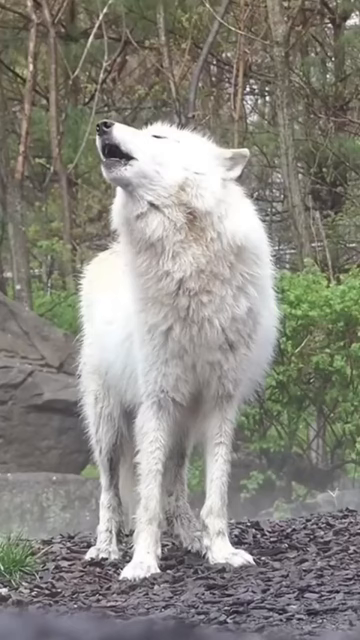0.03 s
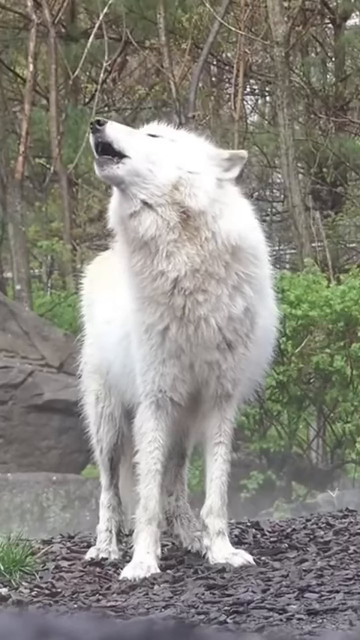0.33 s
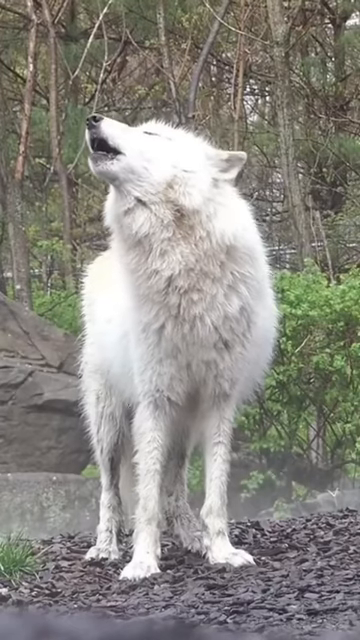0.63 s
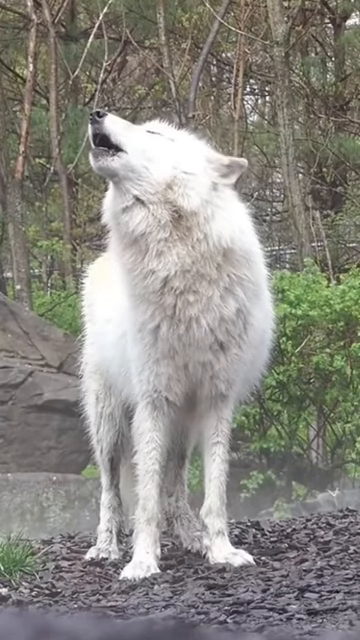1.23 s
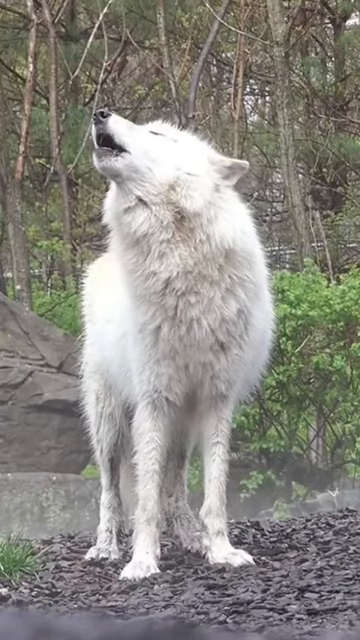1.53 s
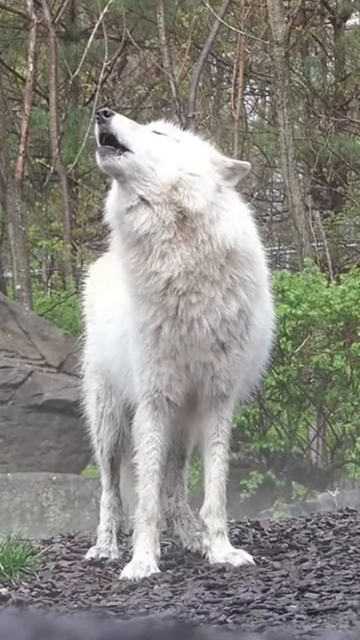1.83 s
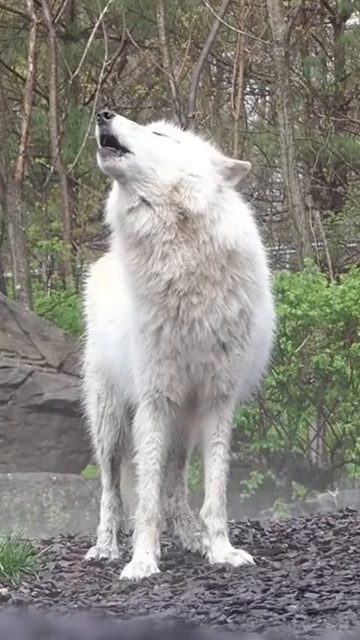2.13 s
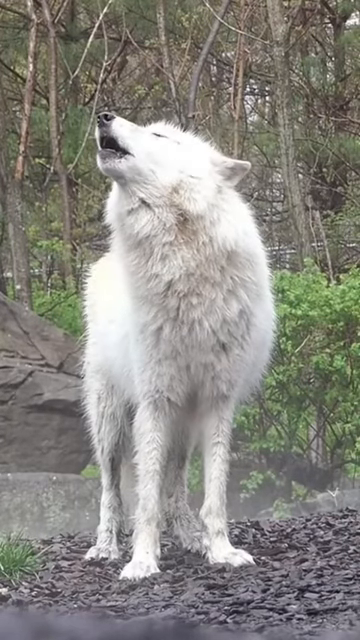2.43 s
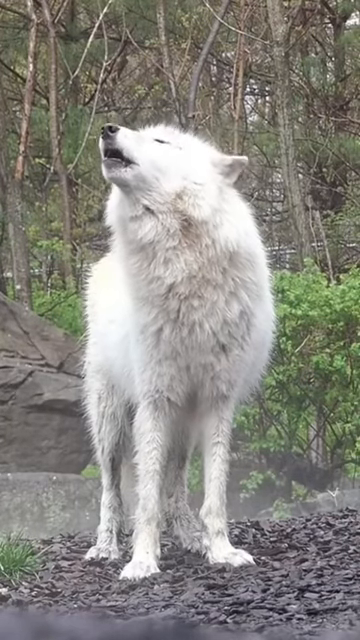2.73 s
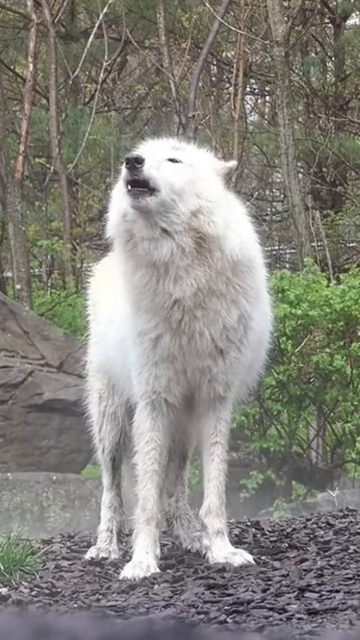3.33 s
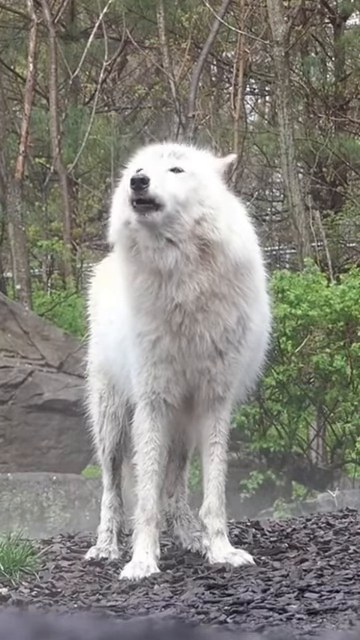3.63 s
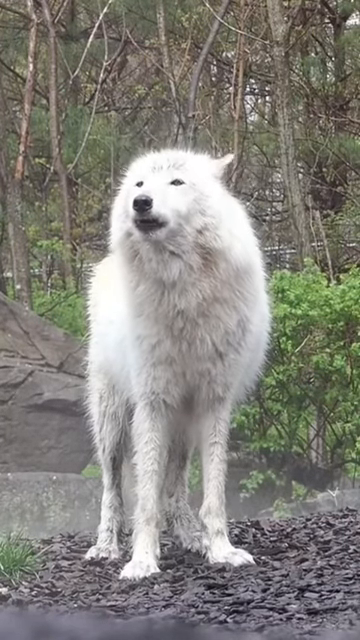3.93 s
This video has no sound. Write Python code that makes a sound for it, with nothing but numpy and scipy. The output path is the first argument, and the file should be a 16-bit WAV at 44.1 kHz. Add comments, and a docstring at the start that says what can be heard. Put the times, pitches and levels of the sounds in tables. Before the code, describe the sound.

A wolf howls close by, turning hoarse as a second wolf joins from farther off.

```python
"""A wolf close by holds one long, slowly sinking howl among trees, while a low outdoor rumble swells.
A thin whistling whine rides over the start, shaken for a moment by a falling squeal. After a faint tick
at about 2 s, a second wolf joins from farther off. Just after that, the near howl breaks to a lower,
hoarse voice: its vocal folds now vibrate in two ways at once, making two tones that beat together."""
import sys
import numpy as np
from scipy import signal
from scipy.fft import rfft, irfft
from scipy.io import wavfile

SR = 44100
rng = np.random.default_rng(int(sys.argv[2]) if len(sys.argv) > 2 else 0)


def file_out(sig):
    """Save sig as 16-bit WAV at sys.argv[1]."""
    # one column per channel
    cols = np.atleast_2d(sig).T
    # limit, then scale
    lim = np.clip(cols, -1, 1)
    pcm = np.round(lim * 32767).astype(np.int16)
    wavfile.write(sys.argv[1], SR, pcm)


N = 176400
T = np.arange(N) / SR
MOUTH_SHIFT_S, BREAK_S, BREAK_FADE_S = 2.1, 2.535, 0.0067


def amp(db):
    """Turns decibels into a gain."""
    return 10 ** (np.asarray(db) / 20)


def unit(x):
    """Scales a signal to an average (rms) size of 1."""
    return x / np.sqrt(np.mean(x ** 2) + 1e-20)


def curves(rows):
    """Turns each column after the time into one value per sample."""
    times, *columns = np.transpose(rows)
    return [np.interp(T, times, column) for column in columns]


def read(points, hz):
    """Looks up a spectrum's level at hz."""
    f, level = np.transpose(points)
    return np.interp(np.log(hz + 1), np.log(f), level)


def gate(start, end, fade=0.0085):
    """Fades in at start and out at end (all in seconds)."""
    return np.sin(np.pi / 2 * np.clip(np.minimum(T - start, end - T) / fade + .5, 0, 1)) ** 2


def during(rows):
    """Lets sound through from a table's first time to its last."""
    return gate(rows[0][0] - .006, rows[-1][0] + 0.017)


def noise(points):
    """Noise shaped like the given spectrum, at size 1."""
    gain = amp(read(points, np.fft.rfftfreq(N, 1 / SR)))
    return unit(irfft(rfft(rng.standard_normal(N)) * gain, N))


def wander(hz):
    """A random wobble, up to about hz times a second."""
    rolloff = 1 + (np.fft.rfftfreq(N, 1 / SR) / hz) ** 4
    return unit(irfft(rfft(rng.standard_normal(N)) / rolloff, N))


def phase(hz, jitter):
    """The running angle of a vibration whose pitch wobbles by the fraction jitter."""
    return 2 * np.pi * np.cumsum(hz * (1 + jitter * wander(45))) / SR


def partial(angle, db, flutter_db=3.5, flutter_hz=14):
    """One pure tone whose strength flutters."""
    return amp(db + flutter_db * wander(flutter_hz)) * np.cos(angle + 2 * np.pi * rng.random())


def airy(angle, width_hz):
    """A narrow band of breathy noise around a tone."""
    return wander(width_hz) * np.cos(angle) + wander(width_hz) * np.sin(angle)


def background():
    """Outdoor air: a steady thin hiss, a swelling distant rumble and a faint far tone."""
    # spectra of the hiss and the rumble: f/Hz, relative level/dB
    hiss_shape = [(1100,2.5),(2800,-6),(4200,-1),(8000,-12.5),(15000,-22.5)]
    rumble_shape = [(55,-30),(85,-8.5),(130,4.5),(230,1.5),(480,-13.5),(1000,-15),(2500,-28),(15000,-45.5)]
    # the rumble's swell: t/s, level/dB
    swell = [(.13,-83.5),(1.6,-63),(2.4,-56.5),(4,-49)]
    rumble = noise(rumble_shape) * amp(curves(swell)[0] + 0.78 * wander(11))
    tone = amp(-86) * airy(2 * np.pi * 413 * T, width_hz=3) * np.clip(T / 1.1, 0, 1)
    return amp(-77.5) * noise(hiss_shape) + rumble + tone * gate(0, BREAK_S)


def clear_howl():
    """A nearly pure note; its faint overtones change as the voice swells and as the mouth shifts."""
    # the clear note: t/s, f/Hz, level/dB
    note = [(.15,713,-43),(.42,709.4,-43.5),(.78,713.6,-40.5),(1.42,701.8,-39),(1.51,695.7,-35),(1.6,685.4,-25),(1.77,676,-30),(1.86,672.7,-27),(2.02,671.7,-26),(2.09,667.8,-29.5),(2.21,657.2,-24),(2.27,645.6,-28.5),(2.38,640,-26),(2.43,613,-31.5),(2.52,604.6,-28)]
    # overtones from the octave up, for soft start, full voice and shifted mouth: relative level/dB
    soft = [-22,-49,-55,-35.5]
    full = [-19,-40.5,-61.5,-64,-50.5]
    late = [-16.5,-49.5,-54,-66,-59,-66.5,-55,-67.5,-58,-67.5,-71.5,-79,-67.5,-68,-64]
    hz, db = curves(note)
    angle = phase(hz, jitter=.0009)
    swelled, shifted = np.interp(T, [0.33, 0.64], [0, 1]), gate(MOUTH_SHIFT_S, np.inf)
    blend = [(1 - swelled, soft), (swelled - shifted, full), (shifted, late)]
    breath = amp(db - 36.5) * airy(angle, width_hz=90)
    voice = partial(angle, db, flutter_db=0.62, flutter_hz=30) + breath
    for i in range(len(late)):
        strength = sum(share * amp(levels[i]) for share, levels in blend if i < len(levels))
        voice += strength * partial((i + 2) * angle, db, flutter_db=4 if i > 1 else 1.3, flutter_hz=10)
    return np.sqrt(2) * voice * gate(0, BREAK_S, BREAK_FADE_S)


def whine():
    """Thin, airy whistles; a falling squeal shakes their strength and pitch while it lasts."""
    # three whistles and the squeal: t/s, f/Hz, level/dB
    whistles = [
        [(.15,5560,-64),(.25,5535,-59.5),(.35,5495,-63),(.5,5460,-61),(.67,5450,-61),(.75,5377,-59.5),(.85,5420,-60.5),(1.07,5376,-71),(1.28,5260,-71)],
        [(1.325,5170,-73.5),(1.4,5050,-70),(1.6,5240,-87.5)],
        [(2.46,4800,-79.5),(2.555,4520,-53.5),(2.62,4110,-66)],
    ]
    squeal = [(.655,1064,-50.5),(.79,976,-60),(.97,936,-61),(1.06,848,-55.5),(1.2,816,-52.5),(1.285,766,-48)]
    hz, db = curves(squeal)
    squeal_angle, on = phase(hz, jitter=0.0042), during(squeal)
    octave_gain = amp(-16.5) / (1 + (2 * hz / 1680) ** 20)  # fades above 1680 Hz
    voice = on * amp(db) * (np.cos(squeal_angle) + octave_gain * np.cos(2 * squeal_angle))
    shake = np.exp(0.82 * on * amp(3.2 * wander(12)) * (np.cos(squeal_angle) - .5))
    for rows in whistles:
        hz, db = curves(rows)
        angle = phase(hz, jitter=0.0035) + .05 * on * np.sin(squeal_angle)
        tone = partial(angle, db, flutter_db=2.5, flutter_hz=15)
        octave = partial(2 * angle, 2 * db + 36) * gate(0, MOUTH_SHIFT_S)  # shows on strong whistles
        breath = amp(db - 20) * airy(angle, width_hz=417)
        voice += during(rows) * shake * (tone + octave + breath)
    return np.sqrt(2) * voice


def trees(x):
    """Tree trunks scatter about 1500 echoes a second, which die away by 60 dB in one second."""
    t = T[:SR]
    tail = rng.standard_normal(SR) * (rng.random(SR) < 1500 / SR)
    tail *= (t > .015) * amp(-60 * t)
    return signal.fftconvolve(x, tail / np.linalg.norm(tail))[:N]


def tick(start_s=2.087, decay_s=0.0062):
    """One faint, bright tick: a burst of noise that dies at once."""
    age = np.maximum(T - start_s, 0)
    burst = rng.standard_normal(N) * (age > 0) * np.exp(-age / decay_s)
    band = signal.butter(2, [2600, 4700], "bandpass", fs=SR, output="sos")
    return amp(-50.5) * signal.sosfilt(band, burst)


def second_wolf():
    """A rounder, almost pure howl from farther off: a rising lead-in, then a long note."""
    # the two notes: t/s, f/Hz, level/dB
    lead_in = [(2.38,661,-55),(2.46,720,-44),(2.6,763,-55)]
    answer = [(2.718,910,-42),(2.791,877.5,-33.5),(2.921,853,-29),(3.12,872.6,-37.5),(3.191,850,-24.5),(3.332,838.3,-25),(3.5,809,-25.5),(3.7,791.2,-23.5),(4,779.7,-20)]
    # their octave: f/Hz, relative level/dB
    octave = [(1570,-42),(1690,-32.5),(1800,-44)]
    voice = np.zeros(N)
    for rows in (lead_in, answer):
        hz, db = curves(rows)
        angle = phase(hz, jitter=0.0012)
        voice += during(rows) * amp(db) * (np.cos(angle) + amp(read(octave, 2 * hz)) * np.cos(2 * angle))
    return np.sqrt(2) * voice


def hoarse_howl():
    """After the break the vocal folds swing unevenly, and a second vibration beats with the first."""
    # the main vibration and the second, lower one: t/s, f/Hz, level/dB
    note = [(2.55,498.6,-33.5),(2.61,463.3,-27.5),(2.72,456.4,-31.5),(2.87,435.8,-25.5),(3.02,441.2,-28.5),(3.13,455,-32.5),(3.25,440,-27),(3.44,441.9,-28),(3.53,477,-30),(3.62,455,-25),(3.74,449,-30.5),(3.865,425,-26.5),(3.9,363.7,-19),(4,346.3,-23)]
    split_note = [(2.56,400.9,-40),(2.64,383.9,-37.5),(3.11,369,-66.5),(3.17,373.3,-35),(3.44,368,-34),(3.53,388.4,-25.5),(3.73,377.7,-25.5),(3.82,384.4,-24.5),(3.885,369.3,-33.5)]
    # overtones the throat gives at full voice: f/Hz, level/dB
    throat = [(280,-42),(720,-35.5),(1000,-46.5),(1350,-45),(1700,-70.5),(2200,-61),(2900,-90.5),(3900,-66.5),(4900,-82)]
    # tones added when every third swing is stronger: multiple of a third of the pitch, relative level/dB
    thirds = [(2,-14),(4,-11),(5,-15.5),(7,-29),(8,-15)]
    # their strength: t/s, level/dB
    thirds_db = [(2.54,-53.5),(2.64,-32.5),(2.86,-27.5),(3.05,-30.5),(3.14,-45.5)]
    full_voice_db, build_s = -20.5, 0.098
    hz, db = curves(note)
    split_hz, split_db = curves(split_note)
    angle, split_angle = phase(hz, jitter=.0035), phase(split_hz, jitter=.0035)
    beat_angle = angle - split_angle
    build = np.clip((T - BREAK_S) / build_s, 0, 1)
    voice = partial(angle, db, flutter_db=0.57, flutter_hz=45)
    for k in range(2, 15):
        voice += build * partial(k * angle, read(throat, k * hz) + 0.49 * (db - full_voice_db))
    for k, level in thirds:
        voice += partial(k * angle / 3, level + curves(thirds_db)[0], flutter_db=1.5) * during(thirds_db)
    voice += partial(1.5 * angle, db=-50) * gate(2.6, 4.1)  # every second swing is stronger
    split = amp(split_db) * np.cos(split_angle)
    # the two vibrations mix, adding tones j beat rates away from k times the pitch
    for k in range(1, 7):
        for j in range(-2, 4):
            if j and (k, j) != (1, -1):  # (1, -1) is the second vibration itself
                level = read(throat, abs(k * hz + j * (hz - split_hz))) - 2.5 - abs(j)
                split += partial(k * angle + j * beat_angle, level + 0.67 * (split_db - full_voice_db))
    tones = np.sqrt(2) * (voice + split * during(split_note))
    return (tones + build * rasp(beat_angle) + head_rings()) * gate(BREAK_S, np.inf, BREAK_FADE_S)


def rasp(beat_angle):
    """Rough breath that pulses with the beat between the two vibrations."""
    # its spectrum: f/Hz, relative level/dB
    shape = [(200,-8),(430,18),(950,2),(1300,9.5),(1750,-20.5),(2150,-8),(2900,-27),(6400,-25),(8200,-34.5),(9600,-29),(15000,-55)]
    # its strength: t/s, level/dB
    strength = [(2.6,-45.5),(3,-50.5),(3.45,-42.5),(3.55,-43.5),(3.85,-42),(3.93,-45.5)]
    pulse = unit(1 + .5 * np.cos(beat_angle))
    return noise(shape) * pulse * amp(curves(strength)[0] + wander(13))


def head_rings():
    """Hoarse air rings at a few high pitches inside the wolf's head."""
    # resonances: start/s, end/s, f/Hz, width/Hz, level/dB
    rings = [(2.6,3.97,4000,130,-64),(1.4,2.93,4450,190,-65.5),(3.5,3.92,3620,45,-66.5),(3.08,4.4,6370,90,-76.5)]
    return sum(gate(start, end, fade=0.087) * amp(db + 2 * wander(12)) * airy(2 * np.pi * hz * T, width)
               for start, end, hz, width, db in rings)


def scene():
    """Mixes the voices, their echoes and the background; the far wolf echoes most."""
    near, thin, far = clear_howl() + hoarse_howl(), whine(), second_wolf()
    echoes = trees(amp(-17) * near + amp(-13.5) * thin + amp(-5) * far)
    return (background() + near + thin + far + echoes + tick())[None]


def record(dry):
    """Opens the sound abruptly out of silence, closes it as quickly and cuts the highest treble."""
    start_s, open_s, close_s, top_hz = 0.1308, 0.00383, .003, 15500
    opening = np.clip((T - start_s) / open_s, 0, 1)
    closing = gate(-1, T[-1] - close_s / 2, close_s)
    lowpass = signal.firwin(511, top_hz, window=("kaiser", 9), fs=SR)
    return signal.oaconvolve(dry * opening * closing, lowpass[None], "same")


dry = scene()
out = record(dry)
file_out(out)
```